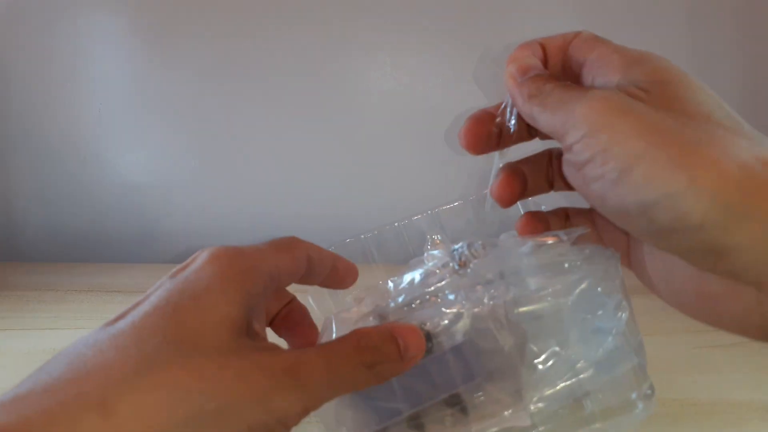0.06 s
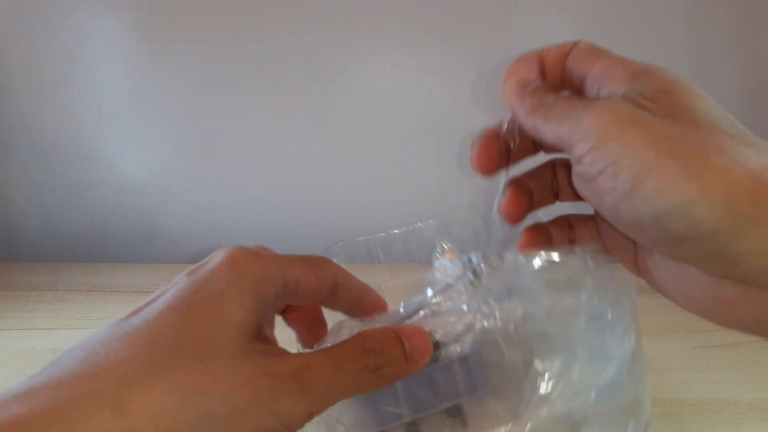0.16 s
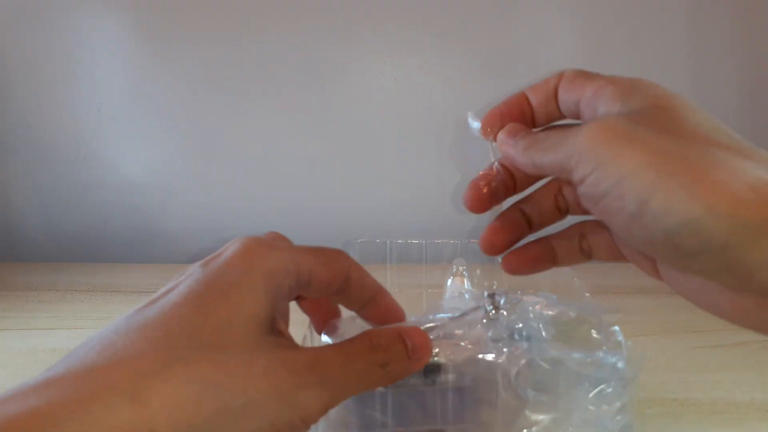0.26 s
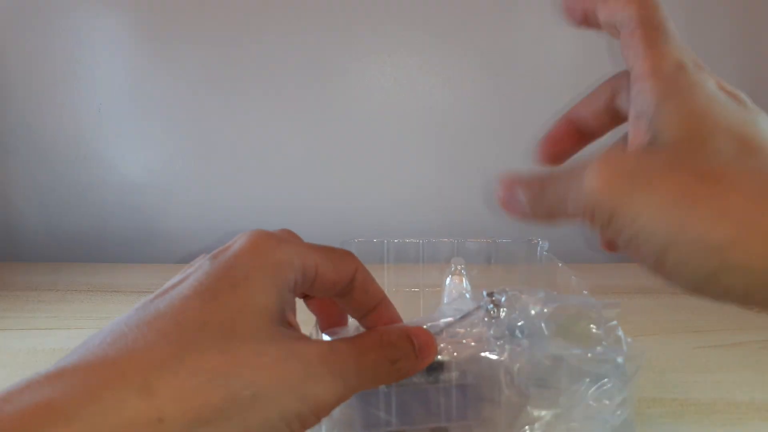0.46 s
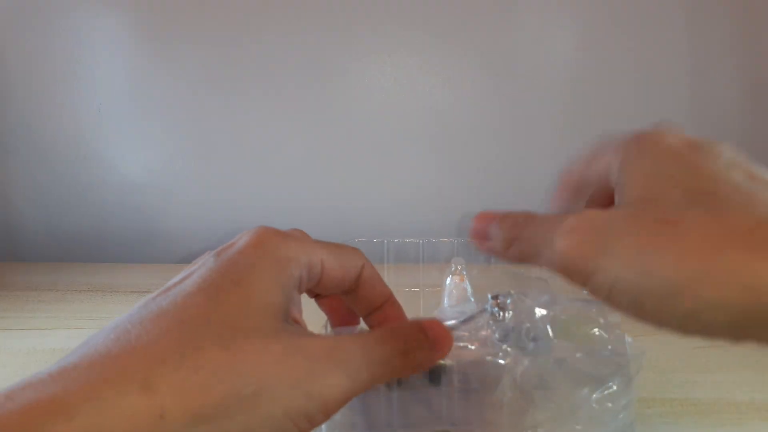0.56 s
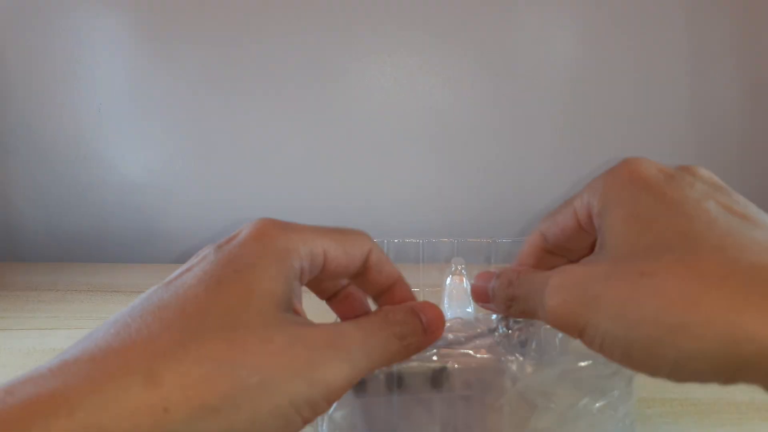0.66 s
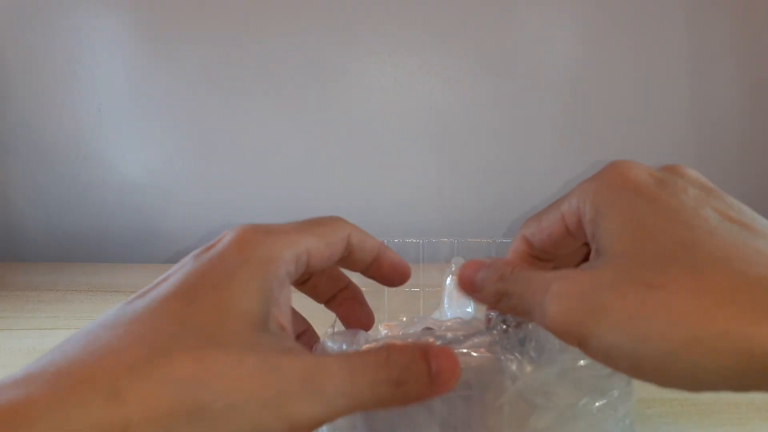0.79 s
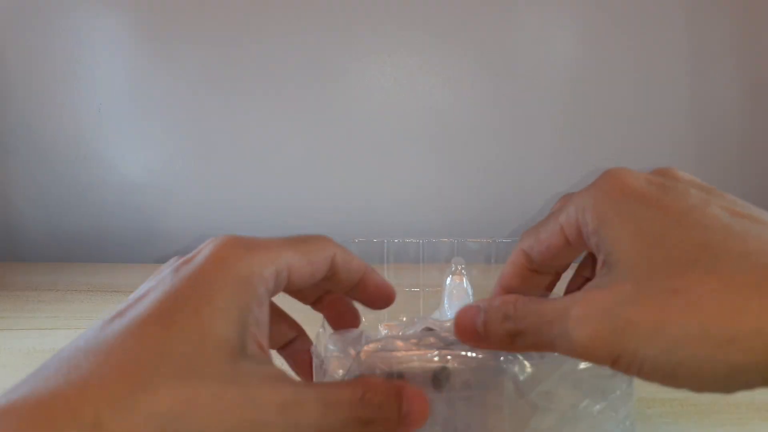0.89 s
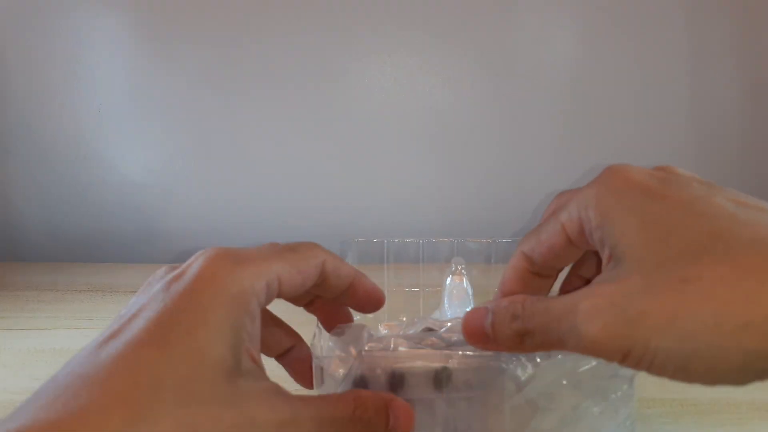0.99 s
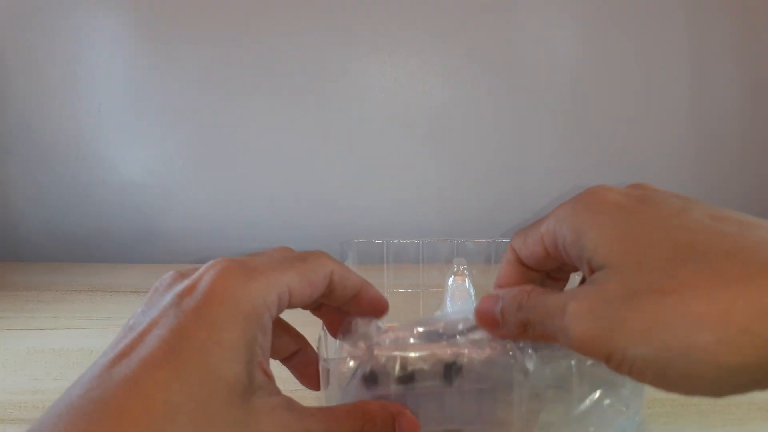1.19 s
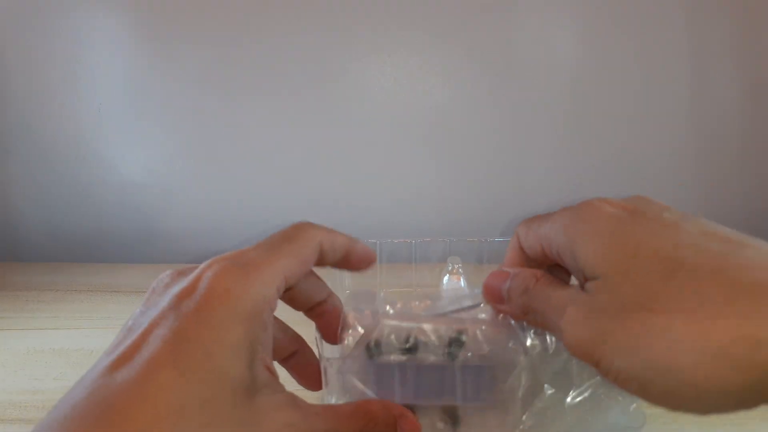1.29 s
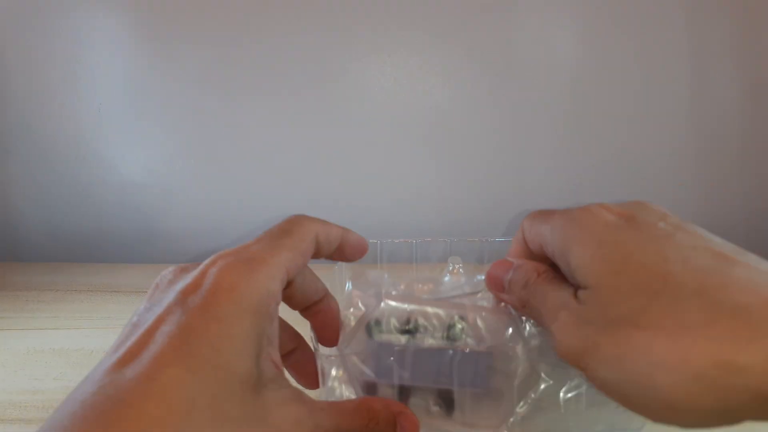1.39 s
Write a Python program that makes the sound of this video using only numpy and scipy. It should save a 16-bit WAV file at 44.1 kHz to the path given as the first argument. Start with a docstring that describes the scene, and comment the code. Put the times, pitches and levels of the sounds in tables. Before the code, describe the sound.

Crisp plastic crackling in uneven bursts, with a hard tray knock on wood near the start, sharp snaps midway, a quieter lull, then a busy flurry of crinkles that thins out; close stereo microphone, small room.

```python
"""Creases in a clear plastic tray and a small bag snap one by one, each a crack, two short rings and a treble tick,
over a bed of small crackles made the same way, with soft flicks of the film.
Two hands handle them on a wooden table: the tray drops and bounces, and short pushes ring the table top.
A small room adds a short tail made of fading noise, over a low rumble and faint hiss,
all heard close up through a two-port microphone."""
import sys
import numpy as np
from scipy import signal
from scipy.fft import rfft, irfft
from scipy.io import wavfile

SR = 44100
rng = np.random.default_rng(int(sys.argv[2]) if len(sys.argv) > 2 else 0)


def master(y):
    """Save y as 16-bit WAV."""
    cut = np.clip(np.atleast_2d(y).T, -1, 1)
    pcm = np.round(cut * 32767)  # scale
    wavfile.write(sys.argv[1], SR, pcm.astype(np.int16))


def volts_from_decibels(level):
    """Turn decibel levels (scalar or array-like) into linear amplitude factors."""
    exponent = np.asarray(level, float) / 20
    return 10 ** exponent


N = 63945  # length in samples

# shared by several sounds
EDGES_HZ = 2500, 9300, 16800  # bottom of the cracks, bottom of the treble ticks, top of everything
LOW_PAN_DB, PAN_SPREAD_DB = -6.5, 5  # left over right for low sounds; range of places


def band(x, lo_hz, hi_hz):
    """Steep band-pass: keeps only the pitches between two limits."""
    sos = signal.butter(3, [lo_hz, min(hi_hz, .45 * SR)], "band", fs=SR, output="sos")
    return signal.sosfilt(sos, x)


def place(length, start_s, grains):
    """Adds short sounds (one per row) into one signal at their start times."""
    at = (start_s * SR).astype(int)[:, None] + np.arange(grains.shape[1])
    return np.bincount(at.ravel(), grains.ravel(), length + 4096)[:length]


def sides(y):
    """Low sounds are a little louder on the right; gives left, right and what the walls get."""
    return y * volts_from_decibels(np.array([[LOW_PAN_DB], [-LOW_PAN_DB], [0]]) / 2)


def modes(table, wobble):
    """Sound of an object struck once, peak 1; its tones wander in phase, as loose parts rattle."""
    t = np.arange(SR // 2) / SR
    wander = wobble * np.cumsum(rng.standard_normal((len(table), len(t))), axis=1)
    h = np.zeros(len(t))
    for (hz, db, t60), drift in zip(table, wander):
        h += volts_from_decibels(db) * np.sin(2 * np.pi * hz * t + drift * hz / 700) * 1000. ** (-t / t60)
    return h / np.abs(h).max()


def creases(start_s, db, hz, treble_db):
    """Each crease builds up and gives way: a broad crack, two short rings and a treble tick."""
    build_ms, rise_ms = 1.26, .3  # time until it gives way; time constant of the build-up
    crack_ms, ring_ms, treble_ms = 1, 0.49, 0.59  # time constants of the fades
    crack_db, second_db = -2.5, -9.5  # crack and second ring, against the first ring
    likeness, lag_samples = 0.47, 1.06  # share of noise power alike on both ports; largest ring lag each way
    pan_db, treble_pan_db = -5, 5.5  # middle left-over-right level; extra for the tick, each way
    ring_room_db = -9  # the rings beam at the microphone, little reaches the walls

    t = np.arange(320) / SR
    noise = rng.standard_normal((len(start_s), 4, 320))
    phase, lag, where, other = rng.random((len(start_s), 4)).T
    lag, other = lag[:, None], other[:, None]
    place_db = pan_db + PAN_SPREAD_DB * (where - .5)
    u = t * 1000 - build_ms

    def fade(ms):
        """Steep growth up to the snap, then a fade."""
        return np.where(u < 0, np.exp(u / rise_ms), np.exp(-u / ms))

    ports, walls = [], []
    for side in (1, -1):
        n = np.sqrt(likeness) * noise[:, :2] + side * np.sqrt(1 - likeness) * noise[:, 2:]
        turn = hz[:, None] * (t + side * lag_samples * lag / SR) + phase[:, None]
        # the pitch of the first ring is roughened by a random walk in phase
        tone = np.sin(2 * np.pi * turn + 0.23 * np.cumsum(noise[:, 0], axis=1)) * fade(ring_ms)
        second = np.sin(2 * np.pi * (3000 + 2300 * other) * t + side * lag) * fade(ring_ms)
        tone = tone + volts_from_decibels(second_db) * second
        gain = volts_from_decibels(db + side * place_db / 2)[:, None]
        treble_gain = gain * volts_from_decibels(treble_db + side * treble_pan_db)[:, None]
        crack = place(N, start_s, gain * volts_from_decibels(crack_db) * n[:, 0] * fade(crack_ms))
        tick = place(N, start_s, treble_gain * n[:, 1] * fade(treble_ms))
        broad = band(crack, *EDGES_HZ[:2]) + band(tick, *EDGES_HZ[1:])
        rings = band(place(N, start_s, gain * tone), *EDGES_HZ[:2])
        ports.append(broad + rings)
        walls.append(broad + volts_from_decibels(ring_room_db) * rings)
    return np.array([ports[0], ports[1], (walls[0] + walls[1]) / 2])


# The tones of the tray when a crease rings it.
# Each row: pitch in Hz (before the tray bends), level in dB against the other rows,
# time to fade by 60 dB in seconds.
TRAY_TONES = [(830, -14.5, 0.015), (917, -9.5, 0.062), (1065, 1.5, 0.017), (1403, 0, 0.015)]


def tray_ring(start_s, db):
    """Each blow rings the tray afresh; it is bent differently each time, which shifts its pitches."""
    flex, wobble, swell_ms = .18, .045, 1.2  # range of pitch shift (share); phase wander; slow start
    out = np.zeros(N + SR)
    swell = 1 - np.exp(-np.arange(SR // 2) * 1000 / SR / swell_ms)
    for at, gain in zip((start_s * SR).astype(int), volts_from_decibels(db)):
        bend = 1 + flex * (rng.random() - .5)
        bent = [(hz * bend, tone_db, t60) for hz, tone_db, t60 in TRAY_TONES]
        out[at:at + SR // 2] += gain * swell * modes(bent, wobble)
    return band(sides(out[:N]), 550, EDGES_HZ[2])


# The loud snaps of single creases.
# Each row: start in seconds, level in dB, pitch of the first ring in Hz,
# treble tick in dB against the snap, tray ring in dB against the snap (both before a shared boost).
CREASE_SNAPS = [(0.0895, -27, 8420, -6.5, -9), (0.1628, -34.5, 5880, -5, -4.5),
                (0.2352, -49.5, 8000, 18, 5), (0.2464, -28, 3010, -29, -2),
                (0.2487, -18.5, 4085, -7.5, 0.5), (0.3478, -32.5, 7650, -4, -35),
                (0.375, -19, 8906, -4.5, -14.5), (0.3808, -27.5, 8700, 1.5, -36),
                (0.4931, -33, 7220, -79, -18.5), (0.5656, -37, 4780, -7, -12),
                (0.5715, -36.5, 8080, -50, -12.5), (0.632, -33.5, 4160, -32, -8.5),
                (0.6397, -34.5, 3240, -42, -28), (0.6522, -30, 7690, -12, -5),
                (0.6665, -39, 4500, -36, -24), (0.6806, -18.5, 8800, -11.5, -11),
                (0.7147, -18, 7530, -12, -24), (0.7317, -35.5, 7800, -6, -18),
                (0.809, -42, 4670, -17, 13.5), (0.8637, -39, 3020, -24, -7), (0.9425, -36, 3950, -37, -21),
                (0.9494, -32.5, 7180, -19, -9.5), (1.0287, -31, 4160, -2, -10),
                (1.0707, -36, 3160, -6, -11), (1.101, -33, 6590, -11, -11), (1.1147, -32, 7280, -42, -14),
                (1.1256, -39.5, 4200, -10, -1.5), (1.1342, -39, 7400, -12, -6),
                (1.1744, -31.5, 3800, -7, -2), (1.1814, -23, 7600, -9, -11), (1.1909, -30, 5280, -3.5, -16),
                (1.198, -25, 7150, -22, -12), (1.2184, -32.5, 5200, -7, -6.5),
                (1.2271, -31.5, 5260, -5.5, -31), (1.2354, -34, 8150, -14, -8),
                (1.265, -23.5, 8600, -24, -13.5), (1.2838, -41, 5330, -17, -5),
                (1.2911, -30, 7320, -27, -10), (1.311, -46, 8050, -23, 3), (1.3302, -32, 8100, -8.5, -10.5),
                (1.345, -36, 5800, -25, -16), (1.4001, -31, 8750, -10.5, -11),
                (1.4404, -32.5, 7800, -8, -10)]


def snaps():
    """The loud creases; each also rings the tray as it gives way."""
    start_s, db, hz, treble_db, tray_db = np.array(CREASE_SNAPS).T
    treble_boost_db, tray_boost_db = 8.5, 8.5
    give_way_s = start_s + 1.26 / 1000  # after the build-up
    tray = tray_ring(give_way_s, db + tray_db + tray_boost_db)
    return creases(start_s, db, hz, treble_db + treble_boost_db) + tray


# How strongly the hands work the plastic, joined by straight lines between the rows.
# Each row: time in seconds, crackle level in dB, rustle level in dB (both before each crease's random size).
HAND_MOVES = [(0, -55.5, -54), (.08, -69, -71.5), (.155, -67.5, -68), (.17, -59, -59), (.24, -56, -50.5),
              (.255, -64, -50), (.34, -55, -47), (.44, -55.5, -61), (.48, -67.5, -65.5), (.555, -74, -67),
              (.605, -55.5, -68.5), (.66, -54, -50), (.74, -81, -55), (.79, -68, -66.5), (.9, -65.5, -57),
              (1.0, -66, -71), (1.1, -62, -66), (1.19, -49.5, -48.5), (1.3, -58.5, -59), (1.38, -68.5, -61),
              (1.45, -74, -62.5)]


def hand_level(column):
    """One column of the hand movements at every sample."""
    rows = np.array(HAND_MOVES)
    return np.interp(np.arange(N) / SR, rows[:, 0], rows[:, column])


def crackle():
    """Many small creases of scattered size, in bunches; each flicks a patch of film of its own pitch."""
    crackles_per_s, scatter_db, bunch_db = 1400, 3.74, 4.5
    treble_db = -0.5  # middle of the tick levels
    panel_low_hz, panel_span, panel_cycles = 313.6, 7.35, 1.43  # lowest pitch, range ratio, ring length
    patch_lag_ms = 0.082  # largest lag is twice this

    when, luck, pitch, spread, sign, panel = rng.random((int(crackles_per_s * N / SR), 6)).T
    start_s = when * (N - 1) / SR
    at = (when * (N - 1)).astype(int)
    # creases within the same 300 samples share a random boost
    bunch = bunch_db * np.repeat(rng.standard_normal(N // 300 + 1), 300)[at]
    size_db = -scatter_db * np.log(np.maximum(luck, .03)) + bunch
    snap_db = hand_level(1)[at] + size_db
    small = creases(start_s, snap_db, 2500 * 3.07 ** pitch, treble_db + 8 * (spread - .5))

    push = volts_from_decibels(hand_level(2)[at] + 0.79 * size_db) * np.sign(sign - .5)
    cycles = (panel_low_hz * panel_span ** panel)[:, None] * np.arange(1024) / SR
    flick = push[:, None] * np.sin(2 * np.pi * cycles) * np.exp(-cycles / panel_cycles)
    spot = 2 * spread - 1  # place across the heap: sets lag and level between the ports
    patches = []
    for side in (1, -1, 0):  # left, right, walls
        gain = volts_from_decibels(side * (LOW_PAN_DB + PAN_SPREAD_DB * spot) / 2)[:, None]
        heard_s = start_s + (1 + side * spot) * patch_lag_ms / 1000
        patches.append(place(N, heard_s, flick * gain))
    return small + band(np.array(patches), 200, EDGES_HZ[2])


# The tray knocking on the table.
# Each row: start in seconds, strength of the table ring in dB, contact time in milliseconds, slap level in dB.
TRAY_KNOCKS = [(.2465, -19.5, 0.3, -19), (0.2502, -7.5, 1.65, -9), (.3762, -20.5, 1.79, -15.5),
               (0.3827, -36, 0.55, -28), (0.815, -25, 2.2, -44), (0.828, -29.5, 1.07, -60)]
# The tones of the table top.
# Each row: pitch in Hz, level in dB against the other rows, time to fade by 60 dB in seconds.
TABLE_TONES = [(123.3, -11, 0.29), (332.7, -1.5, 0.23), (490.6, 6, 0.044), (671, -0.5, 0.14),
               (806, -8.5, 0.067), (1082, -2, 0.058), (1507, 0.5, 0.11), (1813, 5, 0.18)]


def knocks():
    """A short half-sine push rings the table top; a flat landing also slaps, and the film crunches."""
    push_share = 0.67  # part of the contact in which the table is pushed
    table_wobble = 0.074  # phase wander of the table tones
    crunch_db, crunch_t60_s, crunch_hz = -25, .16, (1620, 6280)  # the film shakes after each knock

    start_s, db, contact_ms, slap_db = np.array(TRAY_KNOCKS).T
    u = np.arange(160) / SR * 1000 / contact_ms[:, None]  # 0 to 1 during contact
    shape = np.sin(np.pi * np.clip(u / push_share, 0, 1))
    push = place(N, start_s, volts_from_decibels(db)[:, None] * shape / shape.sum(axis=1, keepdims=True))
    u = np.clip(u, 0, 1)
    slap = place(N, start_s, volts_from_decibels(slap_db)[:, None] * np.sin(2 * np.pi * u) * np.sin(np.pi * u))
    table = signal.fftconvolve(push, modes(TABLE_TONES, table_wobble))[:N]

    # each push leaves a fading shake that drives uneven noise
    shake = signal.lfilter([1], [1, -1000. ** (-1 / crunch_t60_s / SR)], push)
    grit = rng.standard_normal((3, N)) * rng.exponential(size=N)
    crunch = volts_from_decibels(crunch_db) * band(shake * grit, *crunch_hz)
    return band(sides(slap - table + crunch), 70, EDGES_HZ[2])


def room(x):
    """Close reflections off table and wall, then a tail that is alike on both ports in the bass."""
    redraw_s = .06  # a fresh random tail is drawn this often, so no pitch stays coloured
    tail_db, near_db, treble_db = -2.5, -1.5, 1  # treble is on top of the tail level
    low_t60_s, treble_t60_s, near_t60_s = 0.28, .3, 0.016
    split_hz, alike_hz = 2700, 704  # low part ends here; ports differ above here

    t = np.arange(SR // 2) / SR

    def fade(t60):
        """Fade of 60 dB in t60 seconds, scaled so that longer fades start softer."""
        return 1000. ** (-t / t60) / np.sqrt(t60 * SR / 7)

    step, out = int(redraw_s * SR), np.zeros((2, N + SR))
    for at in range(0, N, step):
        mid, side = rng.standard_normal((2, len(t)))
        n = mid + np.array([[1], [-1]]) * band(side, alike_hz, SR)
        low = band(n, 70, split_hz)
        tail = low * fade(low_t60_s) + volts_from_decibels(treble_db) * (n - low) * fade(treble_t60_s)
        near = n * fade(near_t60_s)
        h = (volts_from_decibels(tail_db) * tail + volts_from_decibels(near_db) * near) * (t > .0015)  # nothing returns before 1.5 ms
        y = signal.fftconvolve(x[None, at:at + step], h, axes=1)
        out[:, at:at + y.shape[1]] += y
    return out[:, :N]


def background():
    """A low rumble of the building, the same on both ports, and faint hiss, separate on each."""
    rumble = volts_from_decibels(-55) * band(rng.standard_normal(N), 35, 150)
    hiss = volts_from_decibels(-75) * rng.standard_normal((2, N))
    return rumble + hiss


def scene():
    """All of the handling, straight to the ports and by way of the room, over the background."""
    dry = snaps() + crackle() + knocks()
    return dry[:2] + room(dry[2]) + background()


# How the microphone colours the sound.
# Each row: pitch in Hz, gain in dB.
MIC_RESPONSE = [(30, -13), (100, -4), (2000, 0), (7000, -2), (8200, 4.5), (9000, -1), (9700, -8),
                (11000, -3), (15500, -7.5)]


def microphone(x):
    """A small microphone with a treble peak and dip, as a filter that responds without delay."""
    mic_hz, mic_db = np.array(MIC_RESPONSE).T
    hz = np.fft.rfftfreq(512, 1 / SR)
    log_gain = np.interp(np.log(hz + 1), np.log(mic_hz), mic_db) * np.log(10) / 20
    # folding the cepstrum forward in time gives minimum phase
    cepstrum = irfft(log_gain)
    cepstrum[1:256] *= 2
    cepstrum[257:] = 0
    h = irfft(np.exp(rfft(cepstrum)))
    return signal.fftconvolve(x, h[None], axes=1)[:, :N]


def band_limit(x):
    """A steep low-pass at the top of the band."""
    return signal.sosfilt(signal.butter(12, 16990, fs=SR, output="sos"), x)


def record(dry):
    """The scene as the microphone hears it, made ready for the file."""
    mix = microphone(dry)
    return band_limit(mix)


dry = scene()
out = record(dry)
master(out)
```